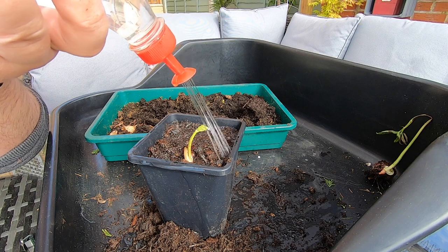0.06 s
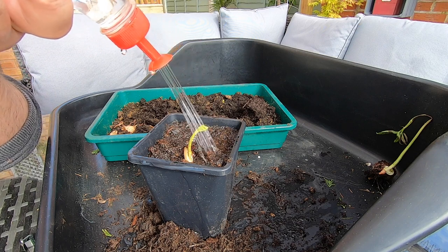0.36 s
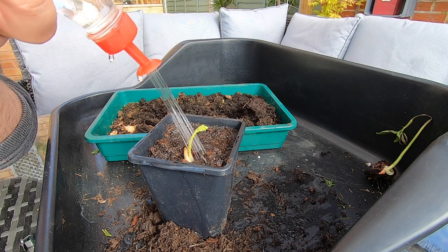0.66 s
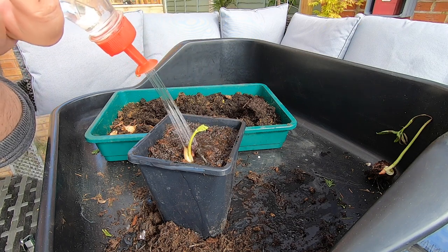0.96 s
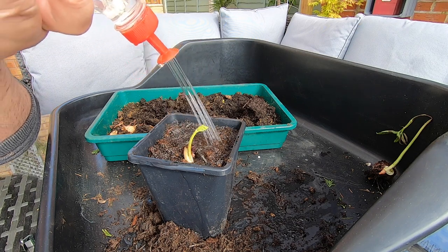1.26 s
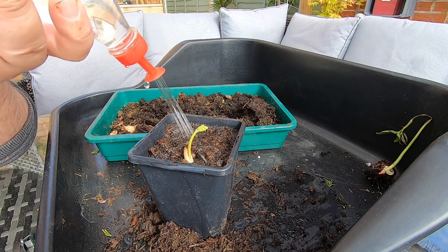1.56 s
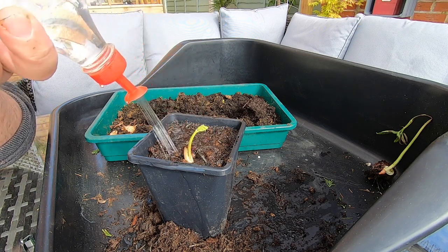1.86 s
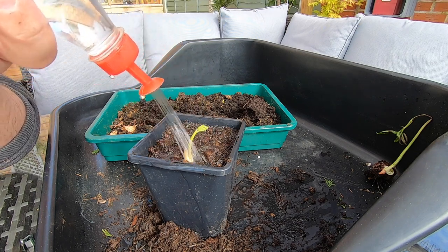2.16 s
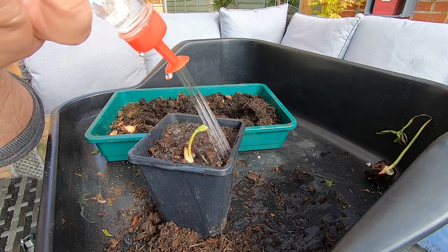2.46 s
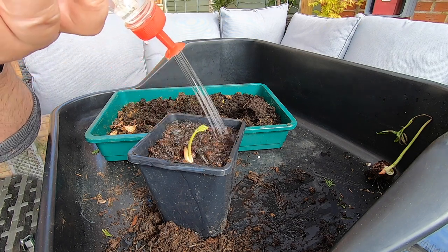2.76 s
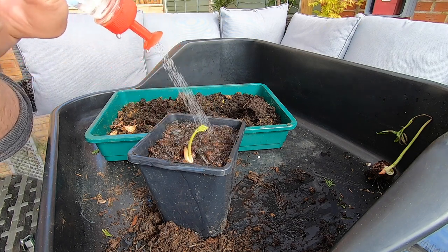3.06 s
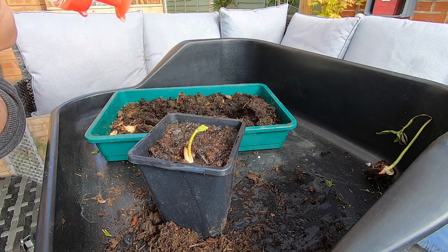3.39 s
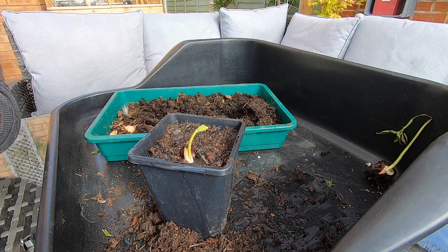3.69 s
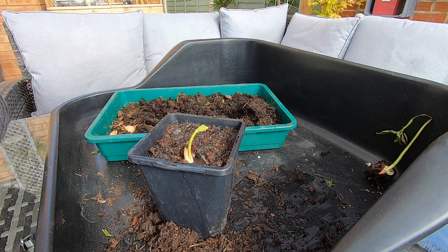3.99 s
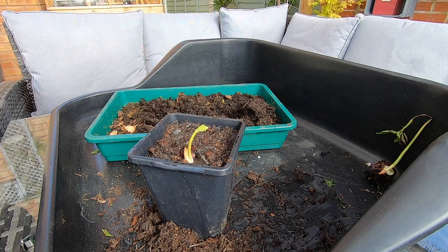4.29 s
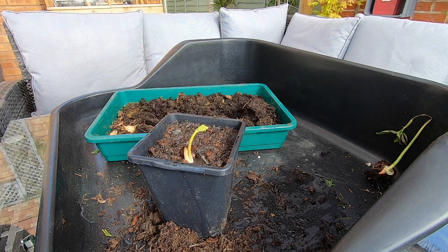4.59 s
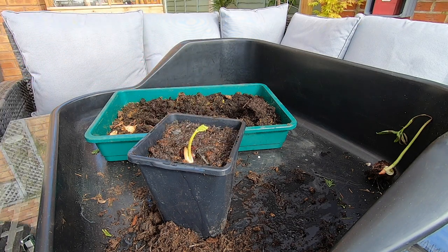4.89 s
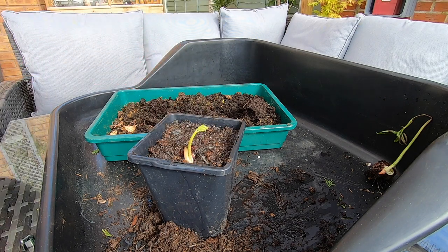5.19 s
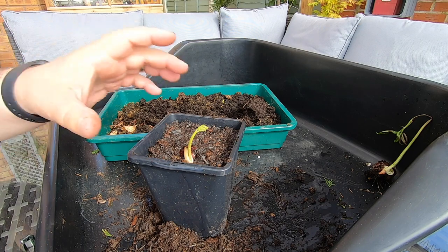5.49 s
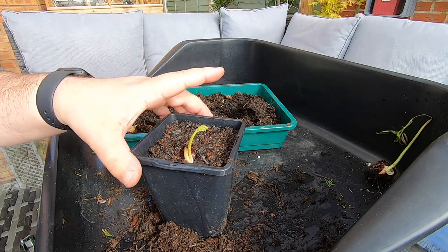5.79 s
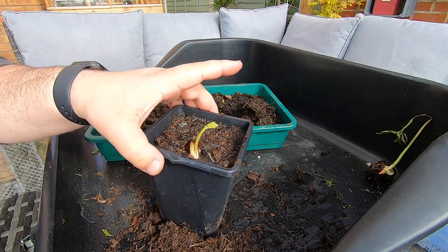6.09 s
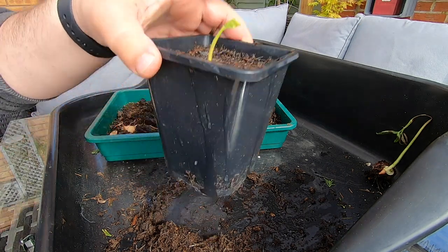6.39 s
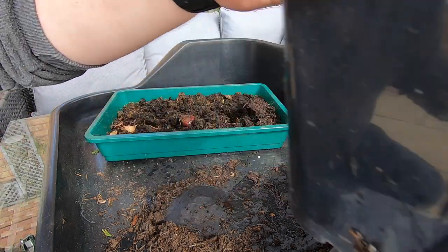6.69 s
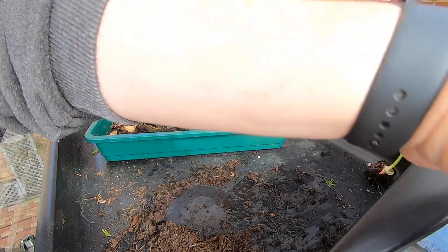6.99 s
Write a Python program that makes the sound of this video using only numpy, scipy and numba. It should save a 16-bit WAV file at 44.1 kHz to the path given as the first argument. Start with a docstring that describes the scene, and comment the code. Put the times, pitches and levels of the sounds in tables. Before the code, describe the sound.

Water sprinkles softly into a plant pot before a bottle is set down with hollow knocks, a seat creaks and a tray is bumped.

```python
"""Outdoors at a potting tray, thin jets from a bottle's sprinkler cap patter on the soil in a plastic pot:
drops splat, trap ringing bubbles and throw fine spray. The bottle is put down to the left with a few
hollow knocks. Clothes and a wicker seat rustle and creak as they catch and slip, and an arm bumps the
tray and lifts the pot. Distant traffic hums and light wind rumbles on the phone's two microphones."""
import sys
import numpy as np
from scipy import signal
from scipy.fft import rfft, irfft
from scipy.io import wavfile
from scipy.ndimage import uniform_filter1d
from numba import njit

SR = 44100
rng = np.random.default_rng(int(sys.argv[2]) if len(sys.argv) > 2 else 0)


def inscribe(sig):
    """Save sig as 16-bit PCM at rate SR to the path in sys.argv[1].

    A 1-D sig is mono; a 2-D sig holds one channel per row.
    Samples are clipped to [-1, 1] before scaling.
    """
    pcm = np.round(np.clip(np.atleast_2d(sig).T, -1, 1) * 32767)
    wavfile.write(sys.argv[1], SR, pcm.astype(np.int16))


N = 310905
T = np.arange(N) / SR
BLOW_T = T[:SR]  # time axis of one blow
POUR_END_S, POUR_RELEASE_S = 3.07, .18  # the bottle tips up and the jets thin out
TOP_HZ = 15800

# Tone of drops splatting, and of fine spray: f/Hz, level/dB
SPLAT_TONE = [(60, -45), (200, -39), (400, -22), (700, 9), (1100, -19), (1700, 9), (2300, 4), (3200, 6.5),
              (4800, 7.5), (6500, 0.5), (8000, -14), (11000, -24), (16000, -27)]
SPRAY_TONE = [(2000, -7), (3500, -7), (5000, 13), (6500, 8), (8000, 14.5), (8700, 3), (9700, 12),
              (11200, -5), (12600, 3), (15500, -13)]
# Water gurgling down into larger air pockets: t/s, level/dB
GURGLES = [(.28, -61.5), (0.402, -58), (0.582, -56), (1.08, -62), (1.51, -65), (2.46, -58.5)]

def water():
    """The jets break into drops that splat, trap bubbles, throw fine spray and drum on the filled pot."""
    flow, ring, splash, hollow_hz = jets()
    hollow_hz = hollow_hz * (1 + .03 * wander(22))
    mist = amp(-69 + wander(30.8)) * flow
    splats = [unit(colour(clicks(rate=6500, spread_db=3), SPLAT_TONE)) for _ in range(2)]
    spray = [unit(colour(clicks(rate=10000, spread_db=2.4), SPRAY_TONE)) for _ in range(2)]
    hollow = bubbles(hollow_hz, spread=.05, cycles=14, spread_db=2.4, count=3600)
    fizz = bubbles(1.45 * hollow_hz, spread=.09, cycles=9, spread_db=2.8, count=3000)  # smaller bubbles
    patter = unit(band_twice(clicks(rate=670, spread_db=5.5), 300, 250))
    pockets = bubbles(hollow_hz, spread=.28, cycles=24, spread_db=2.4, count=400)
    gurgle = bubbles(np.full(N, 1112), spread=.14, cycles=8, spread_db=1.5, count=900)
    gurgle *= swells([(s, .039, db) for s, db in GURGLES], rest_db=-102)
    bubbling = np.hypot(ring, amp(-65) * flow) * (hollow + amp(-7) * fizz)
    splashing = splash * (amp(-3) * splats[0] + soil_gaps() + amp(-8) * pockets)
    liquid = highpass(bubbling + splashing + gurgle, 350)
    mid = liquid + amp(-70) * flow * patter + mist * spray[0]
    side = amp(-14.5) * splash * splats[1] + amp(5) * mist * spray[1]  # thrown back by the tray's walls
    return flutter() * panned(mid + side, mid - side, pan_db=.8)

# The squeeze on the bottle lets up: t/s, length/s, change in flow/dB
WEAK_SQUEEZES = [(0.297, 0.18, -3), (0.896, 0.077, -12.5), (1.818, 0.29, -3), (2.215, 0.067, -7),
                 (2.57, 0.21, -4.5)]
# The jets strike standing water: t/s, length/s, ring level/dB, ring f/Hz, splash level/dB
PUDDLES = [(0.193, 0.098, -54, 3920, -62.5), (0.42, 0.032, -59, 4030, -66),
           (0.503, .14, -56.5, 4040, -55.5), (0.671, 0.1, -57, 4170, -57), (0.787, 0.1, -64, 3470, -83),
           (1.02, 0.11, -55.5, 5170, -55.5), (1.124, 0.12, -56.5, 3080, -58),
           (1.326, 0.073, -56, 3830, -65), (1.462, 0.063, -53, 3660, -57), (1.529, 0.31, -55.5, 3080, -58),
           (1.678, 0.028, -50, 4200, -62), (1.787, 0.035, -60, 6400, -57), (1.855, 0.056, -60, 4700, -62),
           (2.02, 0.15, -54, 3420, -52), (2.4, 0.11, -62, 3880, -58), (2.644, 0.19, -57, 3470, -74),
           (2.827, 0.27, -52.5, 3610, -56)]

def jets():
    """The squeeze sets the flow; puddles splash and ring at the pitch of the hollow the jets dig."""
    soil_hz, soil_db = 3500, -58.5  # bubble pitch and splash on drained soil
    flow = amp(sum(db * hold(s, length_s, .014, .049) for s, length_s, db in WEAK_SQUEEZES))
    flow *= np.clip(1 - (T - POUR_END_S) / POUR_RELEASE_S, 0, 1) ** 2
    wet = np.array([hold(s, length_s, .027, .03) for s, length_s, *_ in PUDDLES])
    _, _, ring_db, ring_hz, splash_db = np.transpose(PUDDLES)
    drained = np.clip(1 - 2 * wet.sum(0), 0, 1)
    hollow_hz = (ring_hz @ wet + soil_hz * drained) / (wet.sum(0) + drained)
    ring, splash = (np.sqrt(amp(db) ** 2 @ wet ** 2) for db in (ring_db, splash_db))
    return flow, ring, np.hypot(splash, amp(soil_db) * flow), hollow_hz

def bubbles(centre_hz, spread, cycles, spread_db, count):
    """Small air pockets ring for a few cycles during the pour, scattered about a pitch."""
    starts = (rng.random(count) * (POUR_END_S + POUR_RELEASE_S) * SR).astype(int)
    hz = np.minimum(centre_hz[starts] * np.exp(spread * rng.standard_normal(count)), TOP_HZ)
    size = amp(spread_db * np.minimum(rng.exponential(size=count), 4))
    turns = hz[:, None] * BLOW_T[:256]
    ring = np.sin(2 * np.pi * turns) * np.exp(-2 * turns / cycles) * (1 - np.exp(-2 * turns))
    samples = starts[:, None] + np.arange(turns.shape[1])
    out = np.bincount(samples.ravel(), (size[:, None] * ring).ravel(), N)  # add up all the bubbles
    return out / np.std(out[:starts.max()])

# Gaps between wet crumbs of soil: f/Hz, width/Hz, level against the splash/dB
SOIL_GAPS = [(3290, 300, -10), (4640, 280, -5.5), (6570, 620, -12), (7900, 500, -16), (9680, 740, -11.5)]

def soil_gaps():
    """Drops ring the gaps in the soil; pitch and level wander as the gaps fill and drain."""
    out = np.zeros(N)
    for hz, width_hz, db in SOIL_GAPS:
        centre_hz = hz + 240 * wander(14)
        ring = unit(glide(clicks(rate=4500, spread_db=2.5), centre_hz, float(width_hz)))
        out += amp(db) * unit(ring * amp(3.8 * wander(18)))
    return out

# A blob of water lands all at once: t/s, boost/dB
SPURTS = [(0.386, 6.5), (.445, 4), (.615, 3), (1.205, 5.5), (1.395, 5.5), (1.5, 1.5), (2.46, 2.5),
          (3.03, 6)]

def flutter():
    """The jets land unevenly, with now and then a stronger spurt."""
    spurts_db = sum(db * np.exp(-((T - s) / .0073) ** 2) for s, db in SPURTS)
    return amp(spurts_db) * unit(amp(1.3 * wander(75)))

def spatter():
    """Stray droplets land on the pot's rim as bright ticks, each with its own pitch."""
    flow, _, splash, _ = jets()
    hz = np.full(N, 7820)
    left, right, both = (bubbles(hz, spread=.14, cycles=6, spread_db=1.6, count=900) for _ in range(3))
    thrown = np.sqrt(flow * splash / splash.max())
    return amp(-60) * thrown * (both + amp(-5) * np.array([left, right]))

# Fat single drops: t/s, level/dB, f/Hz, length/s, left minus right/dB
FAT_DROPS = [(0.566, -40.5, 2200, 0.0065, 6), (0.693, -46.5, 2770, 0.0094, 2.5),
             (1.0215, -38, 1570, 0.00091, 1), (1.6823, -38.5, 4420, 0.0014, 17.5),
             (2.6018, -46, 4240, 0.0013, 24), (2.789, -38, 4700, 0.00025, 25)]

def fat_drops():
    """Big drops land one at a time, each with its own tick."""
    return ticks(FAT_DROPS, width=.6, echo_db=-10, fade_s=.02)

# Tone of settling crumbs: f/Hz, level/dB
CRUMB_TONE = [(1200, -20.5), (3000, 8.5), (6000, -0.5), (9300, 5), (12000, -26), (16000, -32)]

def crumbs():
    """Wet soil settles with faint, lone ticks once the pouring stops."""
    settling = hold(POUR_END_S, 2.3, attack_s=.5, release_s=1.2)
    grains = unit(colour(clicks(rate=28, spread_db=2.5), CRUMB_TONE))
    return amp(-85) * place(settling * grains, pan_db=6, echo_db=3, fade_s=.02)

# Ticks of soil and pot: t/s, level/dB, f/Hz
POT_TICKS = [(5.033, -62, 3890), (5.0753, -61, 5500), (5.112, -50, 4900), (5.881, -58, 5480),
             (5.922, -54, 3570), (6.028, -64, 8040), (6.177, -63, 6500), (6.2373, -54.5, 4200),
             (6.245, -54, 7900), (6.273, -56, 9030), (6.353, -63.5, 9000), (6.387, -63, 8500),
             (6.465, -63, 7500), (6.626, -58, 3240), (6.9038, -61, 8330)]

def pot_ticks():
    """Wet soil and the pot's thin wall tick as they settle and are gripped."""
    length_s, pan_db = .0009, -2
    rows = [(s, db, hz, length_s, pan_db) for s, db, hz in POT_TICKS]
    return lowpass(ticks(rows, width=.6, echo_db=-7, fade_s=.03), 10000, order=6)

# The bottle going down: t/s, crack level/dB, treble cutoff f/Hz, crack length/s, boom level/dB
BOTTLE_KNOCKS = [(3.234, -33, 2500, 0.00089, -58.5), (3.247, -31, 4200, 0.0023, -44.5),
                 (3.2866, -18.5, 2520, 0.0017, -39.5), (3.302, -29.5, 2200, 0.00093, -42.5),
                 (3.348, -21.5, 7400, 0.0014, -42.5), (3.3744, -25, 2375, 0.00057, -39),
                 (3.409, -28, 1698, 0.0013, -35), (3.4446, -6.5, 4580, 0.0006, -18.5),
                 (3.4688, -19.5, 1500, 0.0011, -31.5), (3.4722, -6, 4300, 0.0014, -17),
                 (3.574, -32.5, 2480, 0.00052, -41.5), (3.612, -26.5, 1000, 0.0052, -43.5),
                 (3.6208, -18, 1740, 0.0028, -50), (3.6233, -7.5, 9500, 0.0011, -24)]
# Tone of the plastic's crack: f/Hz, level/dB
CRACK_TONE = [(100, -18.5), (400, -1.5), (850, -2), (1350, -6), (1950, -2.5), (2700, -0.5), (3900, -2.5),
              (5500, -10.5), (7500, -20), (9200, -8.5), (11500, -27.5), (16000, -30)]
# Ring of the bottle's wall: f/Hz, level/dB, fade time/s
WALL_RING = [(2130, -12, 0.081), (2500, -6, 0.078), (2900, 2.5, 0.039), (2950, 0, .05)]
# Hollow ring of bottle and table, with the water's dead thump last: f/Hz, level/dB, fade time/s
HOLLOW_RING = [(66, -12, 0.58), (116, 2, 0.25), (157, 5.5, 0.18), (187.3, 5.5, 0.17), (245, 0.5, 0.086),
               (263.4, -4.5, 0.21), (329.8, 5, 0.1), (384, -3, 0.022), (437, -8.5, 0.05), (472, -7, 0.1),
               (590, -7.5, 0.06), (795, -11, 0.065), (400, 6, 0.011)]

def bottle():
    """Thin plastic cracks and rings at each contact, and the water's weight sets off a hollow boom."""
    cracks, pushes = np.zeros((2, N)), np.zeros(N)
    for s, crack_db, cutoff_hz, length_s, boom_db in BOTTLE_KNOCKS:
        crack = sized(lowpass(colour(burst(length_s), CRACK_TONE), cutoff_hz), crack_db, length_s)
        knock = crack + sized(modes(WALL_RING), crack_db - 23.5, length_s)
        dull = lowpass(knock, 1800, order=1)
        add(cracks, s, place(dull, pan_db=15, echo_db=-6, fade_s=.057))
        add(cracks, s, place(knock - dull, pan_db=9, echo_db=-9, fade_s=.033))
        push = np.hanning(int(.61 * length_s * SR) + 3)  # a longer contact booms lower
        add(pushes, s + length_s / 2, amp(boom_db) * push / push.sum())
    boom = highpass(signal.fftconvolve(pushes, modes(HOLLOW_RING))[:N], 85)
    patio = np.array([echoes(channel, fade_s=.25) for channel in cracks])
    return cracks + amp(-24) * patio + amp(-5) * panned(boom, boom, pan_db=.5)

# Ring of the bottle's cap: f/Hz, level/dB, fade time/s
CAP_RING = [(945, 1, 0.024), (1290, -2, .02), (1490, 0.5, 0.02), (1734, -7, .025)]

def edge_clack():
    """The bottle's cap clacks dryly against the table's edge."""
    out = np.zeros((2, N))
    ring = modes(CAP_RING) * (1 - np.exp(-BLOW_T / .0011))
    add(out, 3.2865, amp(-19) * place(ring, pan_db=15.5, echo_db=-6.5, fade_s=.036))
    return out

# Thump of the bottle's base: f/Hz, level/dB, fade time/s
BASE_RING = [(345, -2.5, .016), (530, -7.5, 0.0079)]

def base_thump():
    """The base lands flat: the water's weight meets the table and the ring dies at once."""
    out = np.zeros(N)
    add(out, 3.4458, highpass(modes(BASE_RING), 140))
    return panned(out, out, pan_db=4)

# Bumps on the tray: t/s, thud level/dB, rattle level/dB, share of the sway's fade time
TRAY_BUMPS = [(4.816, -19.5, -25, 0.2), (5.586, -8.5, -10, 0.85), (5.599, -8.5, -7.5, 1),
              (5.6394, -23.5, -11, 0.89), (5.686, -25.5, -26.5, 0.9)]
# Sway of tray and phone: f/Hz, fade time/s, left level/dB, right level/dB, right lag/radians
TRAY_SWAY = [(45.9, 0.64, -30, -5, 1.6), (65, 0.12, -19, -3, 0.42), (100.1, 0.36, -9, -6, 3.23),
             (126, 0.14, -21, -7.5, 0.17), (246, 0.026, -8, -14, 0.13), (413, 0.089, -22.5, -17.5, 0.3)]
# Tone of the rattle: f/Hz, level/dB
RATTLE_TONE = [(100, 15), (400, -11.5), (800, -8.5), (2800, -18.5), (5000, -34), (9500, -47), (12000, -64),
               (16000, -70)]

def tray():
    """A bump rocks the tray and the phone, and loose things rattle on it."""
    out, rattle_s = np.zeros((2, N)), .004
    onset = 1 - np.exp(-BLOW_T / .00084)
    for s, thud_db, rattle_db, share in TRAY_BUMPS:
        for hz, fade_s, left_db, right_db, lag in TRAY_SWAY:
            sway = amp([[left_db], [right_db]]) * np.sin(2 * np.pi * hz * BLOW_T - [[0], [lag]])
            add(out, s, amp(thud_db) * sway * onset * fade(share * fade_s))
        rattle = colour(sized(burst(rattle_s), rattle_db, rattle_s), RATTLE_TONE)
        dull = lowpass(rattle, 900, order=1)  # the low part rings on longer
        add(out, s, place(dull, pan_db=-4, echo_db=-1, fade_s=.52))
        add(out, s, place(rattle - dull, pan_db=-6, echo_db=-1, fade_s=.15))
    return out

# Creaks of seat and pot: t/s, level/dB, f/Hz, length/s, left minus right/dB
CREAKS = [(3.757, -42.5, 780, 0.0023, 13), (3.9012, -39, 3250, 0.00076, 3), (3.917, -37, 2700, 0.00081, 9),
          (3.9735, -39.5, 2080, 0.0013, 11), (4.098, -46, 2300, 0.0012, 8), (4.115, -50, 4500, 0.002, 7),
          (4.1405, -44, 2220, 0.0008, 10), (4.1505, -42, 1500, 0.00065, 6), (4.162, -39, 3000, 0.0006, 9),
          (4.176, -39, 2000, 0.0007, 7), (4.186, -36, 1120, 0.0022, 10), (4.199, -35, 720, 0.0015, -4),
          (4.2115, -27.5, 1400, 0.0011, 10), (4.2958, -38, 2290, 0.00058, 5), (4.338, -45, 602, .003, 1),
          (4.4375, -42, 1690, 0.0011, 8), (4.474, -45, 1720, .0013, 2), (4.785, -38, 447, 0.0076, 0),
          (4.989, -47, 1560, 0.0017, 17.5), (5.457, -36.5, 3020, 0.0013, 6.5),
          (5.469, -43, 2990, 0.0016, 7), (5.786, -41, 2600, 0.00058, -8), (6.6482, -44, 1910, 0.00053, 2.5)]

def creaks():
    """The seat and the pot creak in short, separate snaps."""
    return ticks(CREAKS, width=.8, echo_db=-8, fade_s=.04)

def wicker():
    """Strands of the seat slip, each at its own pitch, harder as the weight on it shifts."""
    grains = sum(unit(band_twice(clicks(rate=55, spread_db=1.5), hz, hz / 5))
                 for hz in (650, 1100, 1700, 2500, 3500))
    strain = hold(4.06, .14, attack_s=.13, release_s=.04)
    strain += amp(-14) * hold(3.95, .45, attack_s=.05, release_s=.1)
    return amp(-62.5) * place(grains * strain, pan_db=9.5, echo_db=-2, fade_s=.03)

# Things sliding over each other, and the pitched ring of one wet tick (5.878 s): t/s, length/s, level/dB, f/Hz,
# width/Hz, left minus right/dB
SLIDES = [(3.202, 0.1, -46.5, 1300, 3020, 1.5), (3.271, 0.19, -49.5, 1320, 3000, 1.5),
          (3.5, 0.26, -75, 1940, 3600, -27), (4.073, 0.23, -56, 516, 820, 3),
          (4.182, 0.019, -46, 3260, 900, 17), (4.237, 0.18, -56.5, 497, 505, 3),
          (4.769, 0.053, -51, 1180, 1690, 4.5), (5.878, 0.055, -64, 3500, 500, -4),
          (6.159, 0.096, -65.5, 4000, 1106, -1)]

def slides():
    """Surfaces stick and slip, ringing one band of pitches: broad for a scrape, narrow for a squeak."""
    out, slips = np.zeros((2, N)), clicks(rate=1600, spread_db=4)
    for s, length_s, db, hz, width_hz, pan_db in SLIDES:
        span = slips[int(s * SR):int((s + length_s) * SR)]
        rub = unit(band_twice(span, hz, width_hz)) * signal.windows.tukey(len(span), .6)
        add(out, s, amp(db) * place(rub, pan_db, echo_db=-14, fade_s=.052))
    return out

def sleeve_squeak():
    """The sleeve slips with a squeak and a dry rasp as the arm reaches; the pitch falls as it slows."""
    start_s, length_s, width_hz = 5.455, .125, 320.
    t = BLOW_T[:int(length_s * SR)]
    hz = 1960 - 2000 * t
    slips = clicks(rate=2500, spread_db=2)[:len(t)]
    tone = unit(glide(glide(slips, hz, width_hz), hz, width_hz))
    rasp = amp(-5) * unit(band_twice(slips, 2900, 1300))
    squeak = (tone + rasp) * signal.windows.tukey(len(t), .3) * amp(-70 * t)
    out = np.zeros((2, N))
    add(out, start_s, amp(-53.5) * place(squeak, pan_db=14, echo_db=-4.5, fade_s=.065))
    return out

# Arm and body movements: peak t/s, swell time/s, scrape level/dB, cloth level/dB
BODY_MOVES = [(3.31, 0.049, -49, -71), (3.55, 0.17, -52, -61), (3.74, 0.052, -54.5, -68),
              (4.028, 0.046, -60.5, -58.5), (4.179, 0.035, -53.5, -60), (4.48, 0.02, -64, -65),
              (4.69, 0.087, -65, -59.5), (5.48, 0.12, -64.5, -64.5), (5.93, 0.15, -71, -69),
              (6.24, 0.019, -68.5, -62), (6.919, 0.086, -74.5, -76.5)]
# Tone of scraping, and of sliding cloth: f/Hz, level/dB
SCRAPE_TONE = [(150, -4), (500, 11.5), (1300, 6), (2100, 7.5), (3300, 4), (5000, -14), (8000, -17.5),
               (16000, -73)]
CLOTH_TONE = [(2000, 0), (4000, 5), (5500, 0), (7000, -7), (9000, -1.5), (10500, -15), (12000, -25.5),
              (16000, -49.5)]

def rustle():
    """Rough surfaces catch and let go in grains; cloth slides with a finer hiss."""
    scrape_gain = swells([(s, swell_s, db) for s, swell_s, db, _ in BODY_MOVES], rest_db=-85)
    cloth_gain = swells([(s, swell_s, db) for s, swell_s, _, db in BODY_MOVES], rest_db=-80.5)
    layers = []
    for _ in range(2):
        scrape = unit(colour(clicks(rate=2900, spread_db=2), SCRAPE_TONE)) * amp(3.8 * wander(42))
        cloth = unit(colour(clicks(rate=13000, spread_db=4.5), CLOTH_TONE)) * amp(2 * wander(70))
        layers.append(scrape_gain * scrape + cloth_gain * cloth)
    mid, side = layers
    return panned(mid + side, mid - amp(-4) * side, pan_db=-1.5)

# Loudness of the far traffic: t/s, level/dB
TRAFFIC_LEVEL = [(0, -57.5), (0.9, -58), (2.1, -56), (3.1, -57), (3.95, -67.5), (4.5, -57), (6.1, -61),
                 (6.6, -63), (7.05, -58)]
# Tone of its hum, and the extra shaping of what differs between left and right: f/Hz, level/dB
HUM_TONE = [(30, -19.5), (90, -9.5), (170, 5), (290, -4.5), (420, -13), (650, -14), (1080, -10.5),
            (1500, -10.5), (2200, -20), (5000, -35), (9000, -40), (12000, -51.5), (16000, -71.5)]
SIDE_TONE = [(60, -13), (200, -13.5), (400, -4), (700, 0.5), (1300, -1.5), (8000, 1.5)]
# Tyres on a far road: f/Hz, width/Hz, level/dB
TYRE_BANDS = [(910, 260, -12), (1050, 110, -16), (1180, 110, -17)]
# A far car goes by: nearest t/s, swell time/s, tyre boost/dB
PASSING_CARS = [(6.15, 0.42, 6.5)]

def traffic():
    """Far traffic hums; its tyre noise wavers in narrow bands and swells as a car passes."""
    passing = swells(PASSING_CARS, rest_db=-1)
    layers = []
    for _ in range(2):
        hum = unit(colour(rng.standard_normal(N), HUM_TONE)) * amp(1.8 * wander(10))
        tyres = sum(unit(band_twice(rng.standard_normal(N), hz, width_hz)) * amp(db + 4 * wander(13))
                    for hz, width_hz, db in TYRE_BANDS)
        layers.append(hum + passing * tyres)
    mid, side = layers[0], colour(layers[1], SIDE_TONE)
    level_db = np.interp(T, *np.transpose(TRAFFIC_LEVEL))
    return amp(level_db) * np.array([mid + side, mid - side])

# Gusts on the microphones: peak t/s, swell time/s, level/dB
GUSTS = [(.33, 0.048, -55.5), (1.56, 0.036, -38), (2.1, 0.19, -69), (3.56, 0.06, -45), (4.26, 0.051, -46.5),
         (4.7, 0.19, -63), (5.97, 0.084, -44), (6.86, 0.033, -41)]
# Tone of the wind: f/Hz, level/dB
WIND_TONE = [(15, 2.5), (40, 3), (90, -1.5), (160, -15), (300, -43.5), (1000, -54), (8000, -84)]

def wind():
    """A breeze and its gusts rumble separately at each microphone."""
    left, right = (unit(colour(rng.standard_normal(N), WIND_TONE)) for _ in range(2))
    return swells(GUSTS, rest_db=-69.5) * panned(left, right, pan_db=-5.5)

def ticks(rows, width, echo_db, fade_s):
    """Brief contacts: a dry snap and a short ring at one pitch."""
    out = np.zeros((2, N))
    for s, db, hz, length_s, pan_db in rows:
        snap = lowpass(band(burst(length_s), hz, width * hz), 1.35 * hz, order=3)
        ring = sized(modes([(hz, 0, 10 * length_s)]), db - 11, length_s)
        add(out, s, place(sized(snap, db, length_s) + ring, pan_db, echo_db, fade_s))
    return out

def modes(rows):
    """The tones an object rings with after one tap; neighbouring pairs swing opposite ways."""
    return sum((-1) ** (k // 2) * amp(db) * np.sin(2 * np.pi * hz * BLOW_T) * fade(fade_s)
               for k, (hz, db, fade_s) in enumerate(rows))

def clicks(rate, spread_db):
    """Tiny random impacts, about `rate` a second, a few much larger than the rest."""
    size = amp(spread_db * np.minimum(rng.exponential(size=N), 4))
    return unit((rng.random(N) < rate / SR) * size * rng.choice([-1, 1], N))

def burst(length_s):
    """Many small slips that build up for length_s, then die away."""
    return rng.standard_normal(len(BLOW_T)) * BLOW_T * np.exp(-BLOW_T / length_s)

def wander(rate):
    """A smooth random drift of size about 1, with `rate` new values a second."""
    step = int(SR / rate)
    stairs = np.repeat(rng.standard_normal(N // step + 1), step)
    return unit(uniform_filter1d(uniform_filter1d(stairs, step), step)[:N])

def fade(fade_s):
    """A gain that falls by 60 dB in the fade time."""
    return np.exp(-np.log(1000) * BLOW_T / fade_s)

def hold(s, length_s, attack_s, release_s):
    """A gain that rises from 0 to 1, stays there and falls back."""
    return np.clip(np.minimum((T - s) / attack_s, 1 - (T - s - length_s) / release_s), 0, 1)

def swells(rows, rest_db):
    """A gain that rises and falls smoothly about each moment, over a resting level."""
    power = sum((amp(db) / np.cosh(np.clip((T - s) / swell_s, -20, 20))) ** 2 for s, swell_s, db in rows)
    return np.sqrt(amp(rest_db) ** 2 + power)

def colour(x, points):
    """Shape a sound's tone along a curve of f/Hz, level/dB points."""
    size = 4096
    hz, db = np.transpose(points)
    curve_db = np.interp(np.log(np.fft.rfftfreq(size, 1 / SR) + 1), np.log(hz), db)
    cepstrum = irfft(np.log(amp(curve_db)))[:size // 2]
    cepstrum[1:] *= 2  # one half, doubled: nothing rings before the sound arrives
    return signal.fftconvolve(x, irfft(np.exp(rfft(cepstrum, size))))[:len(x)]

def lowpass(x, hz, order=2):
    """Soften the treble above a pitch."""
    return signal.sosfilt(signal.butter(order, min(hz, SR / 3), fs=SR, output="sos"), x)

def highpass(x, hz):
    """Thin out the bass below a pitch."""
    return signal.sosfilt(signal.butter(2, hz, "high", fs=SR, output="sos"), x)

def band(x, hz, width_hz):
    """One resonance: keep what lies near a pitch."""
    return signal.lfilter(*signal.iirpeak(hz, hz / min(width_hz, SR / 4), fs=SR), x)

def band_twice(x, hz, width_hz):
    """A resonance with steeper sides."""
    return band(band(x, hz, width_hz), hz, width_hz)

@njit
def glide(x, hz, width_hz):
    """A resonance whose pitch moves."""
    out, band_state, low_state = np.empty(len(x)), 0., 0.
    for i in range(len(x)):
        tuning, damping = np.tan(np.pi * hz[i] / SR), width_hz / hz[i]
        swing = (band_state + tuning * (x[i] + 1e-18 - low_state)) / (1 + tuning * (tuning + damping))
        band_state = 2 * swing - band_state
        low_state += 2 * tuning * swing
        out[i] = damping * swing
    return out

def echoes(x, fade_s):
    """A short cloud of reflections, about as strong as the sound itself."""
    cloud = rng.standard_normal(len(BLOW_T)) * fade(fade_s)
    return signal.fftconvolve(x, cloud / np.linalg.norm(cloud))[:len(x)]

def place(x, pan_db, echo_db, fade_s):
    """Put a sound to one side, with reflections that differ at each microphone."""
    lag = int(.00013 * SR * np.clip(pan_db / 6, 0, 1))  # sound from the left reaches the right later
    left, right = (direct + amp(echo_db) * echoes(direct, fade_s) for direct in (x, np.roll(x, lag)))
    return panned(left, right, pan_db)

def panned(left, right, pan_db):
    """Two channels, with the left raised by pan_db against the right."""
    return np.array([left * amp(pan_db / 2), right * amp(-pan_db / 2)])

def sized(x, db, length_s):
    """Give a blow the energy of a tone held at this level for its length."""
    return x * amp(db) * np.sqrt(length_s * SR / 2) / np.linalg.norm(x)

def add(out, s, x):
    """Mix a sound in at s seconds."""
    start = int(s * SR)
    out[..., start:start + x.shape[-1]] += x[..., :N - start]

def amp(db):
    """Decibels to gain."""
    return 10 ** (np.asarray(db) / 20)

def unit(x):
    """Scale to an average power of 1."""
    return x / np.sqrt(np.mean(x ** 2))

def scene():
    """Everything as it reaches the two microphones."""
    small_ticks = fat_drops() + creaks() + pot_ticks()
    watering = water() + spatter() + crumbs()
    bottle_down = edge_clack() + bottle() + base_thump()
    moving = wicker() + slides() + sleeve_squeak() + tray() + rustle()
    return watering + bottle_down + small_ticks + moving + traffic() + wind()

def record(dry):
    """The microphone openings dull one narrow treble band; peaks past 1 clip; the top treble is cut."""
    heard = dry - .5 * band(dry, hz=8870, width_hz=440)
    top_cut = signal.ellip(8, .2, 70, TOP_HZ, fs=SR, output="sos")
    return signal.sosfilt(top_cut, np.clip(heard, -1, 1))

dry = scene()
out = record(dry)
inscribe(out)
```